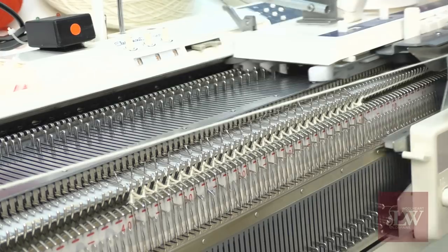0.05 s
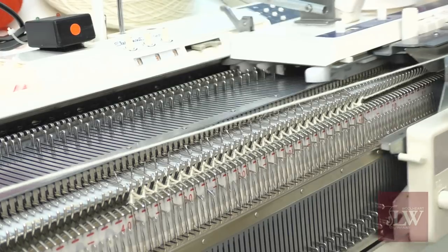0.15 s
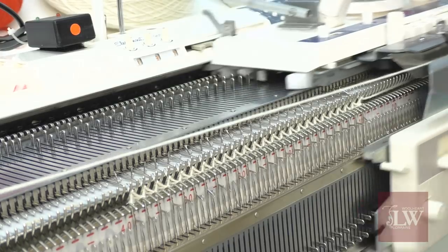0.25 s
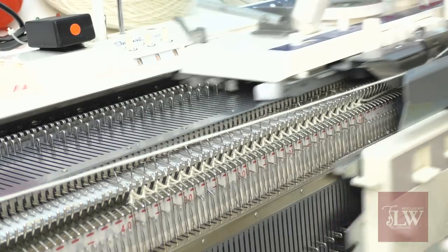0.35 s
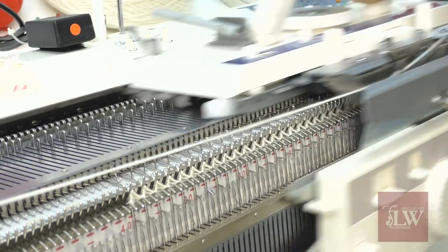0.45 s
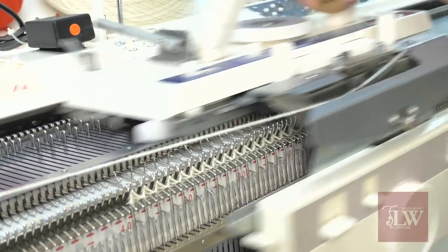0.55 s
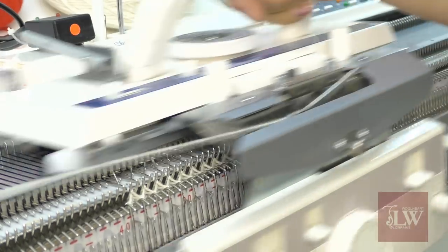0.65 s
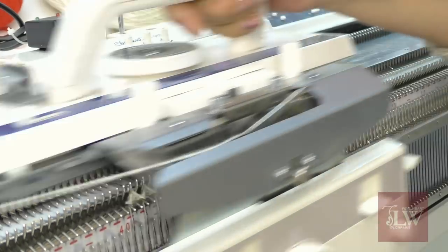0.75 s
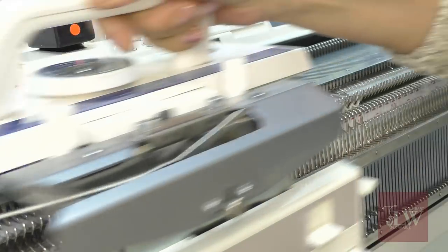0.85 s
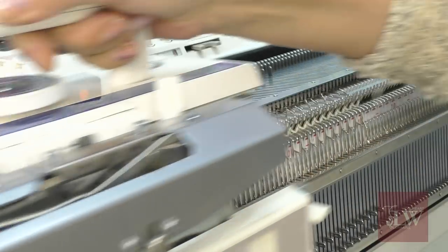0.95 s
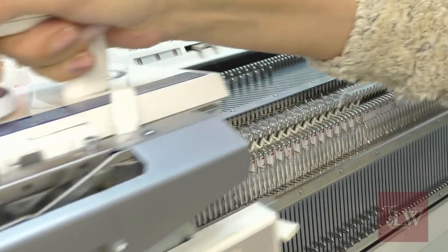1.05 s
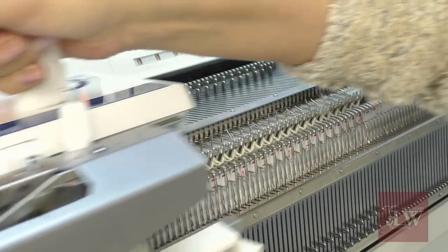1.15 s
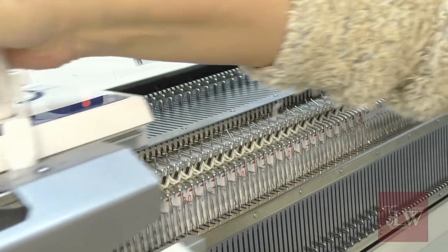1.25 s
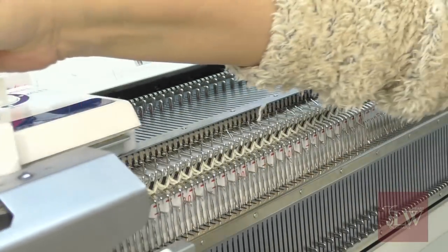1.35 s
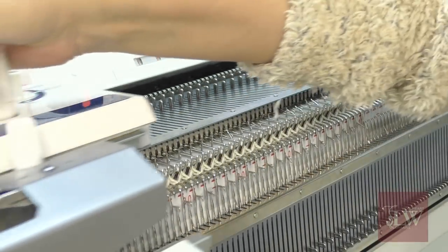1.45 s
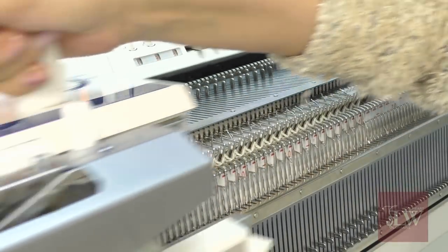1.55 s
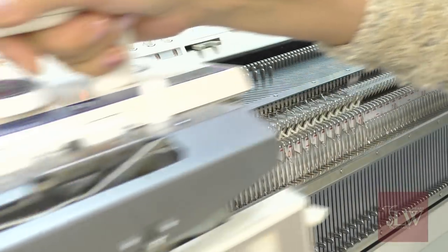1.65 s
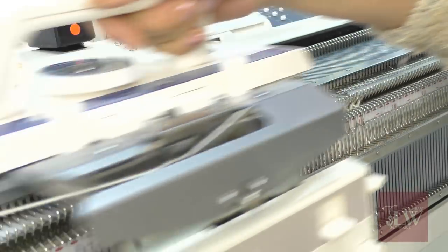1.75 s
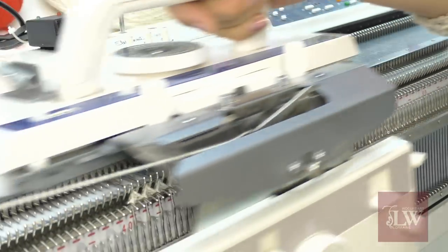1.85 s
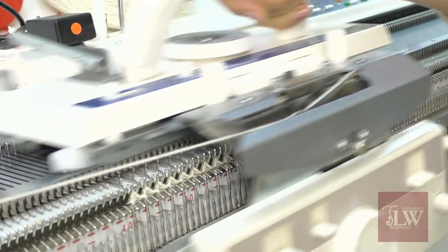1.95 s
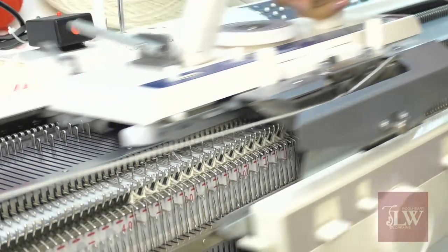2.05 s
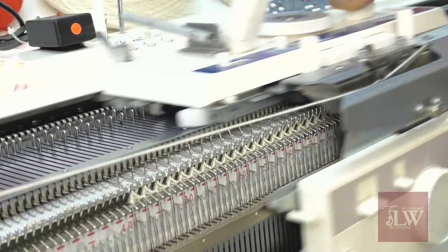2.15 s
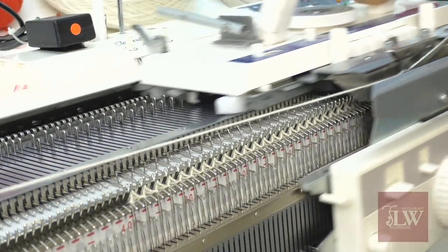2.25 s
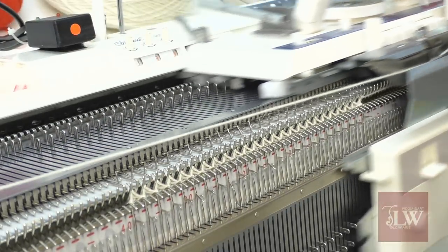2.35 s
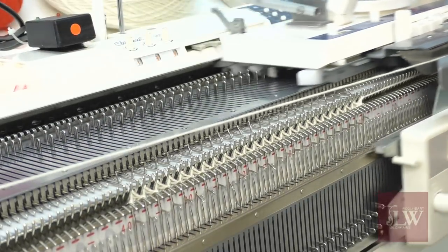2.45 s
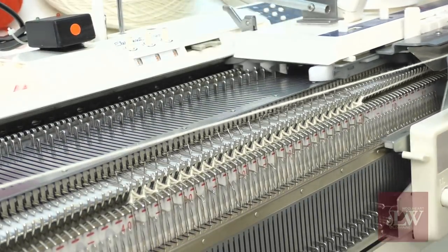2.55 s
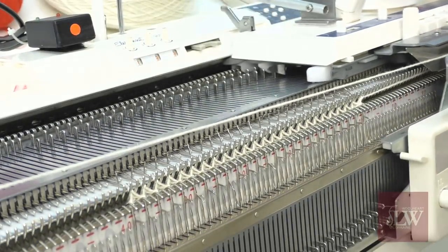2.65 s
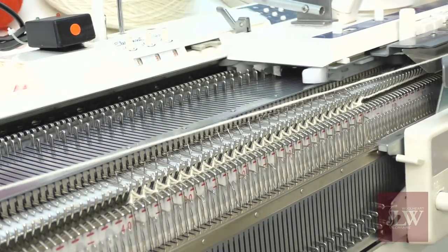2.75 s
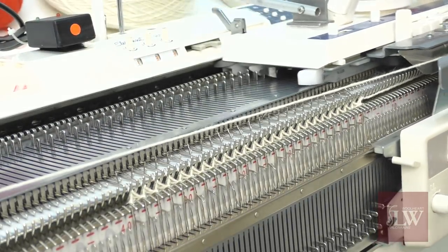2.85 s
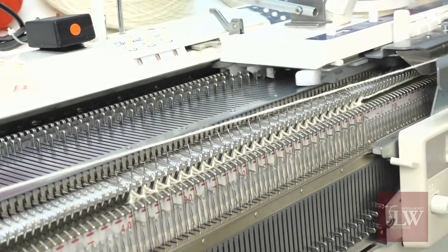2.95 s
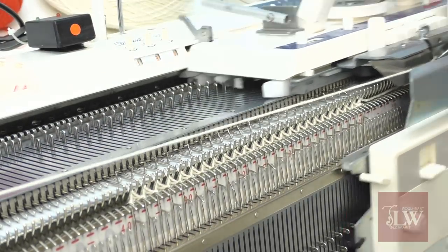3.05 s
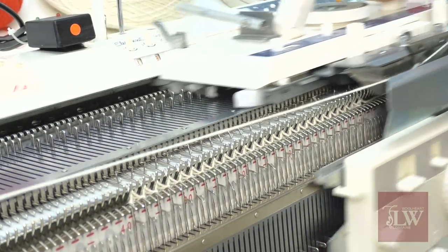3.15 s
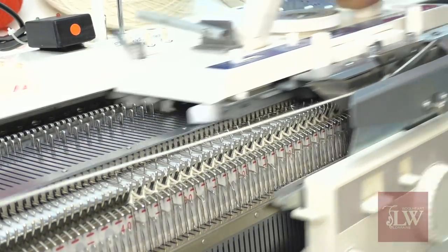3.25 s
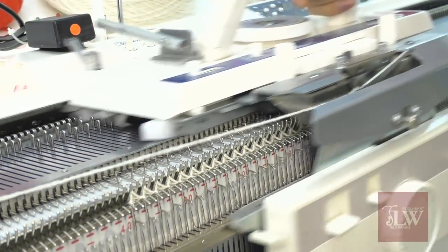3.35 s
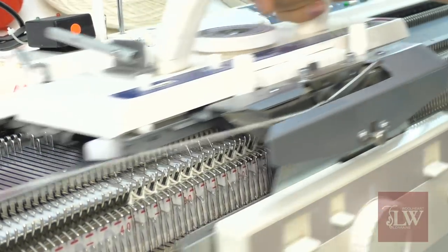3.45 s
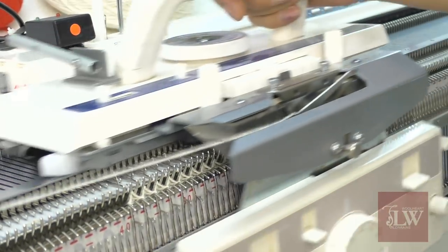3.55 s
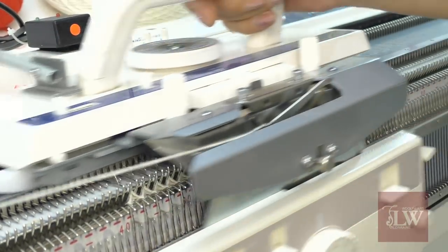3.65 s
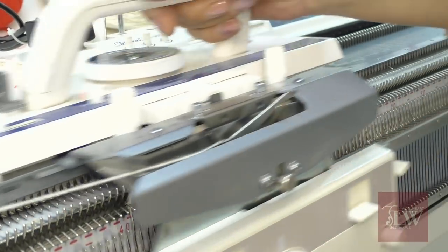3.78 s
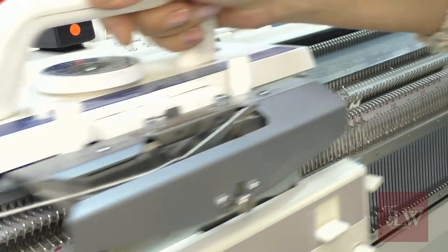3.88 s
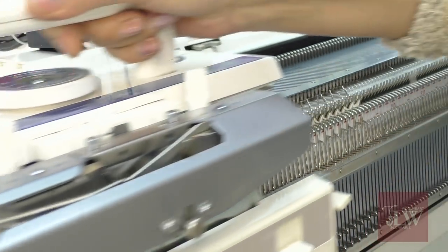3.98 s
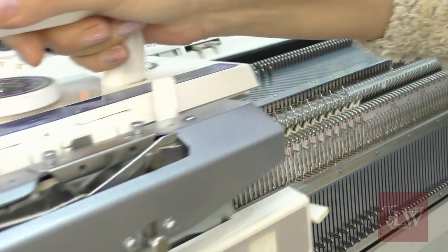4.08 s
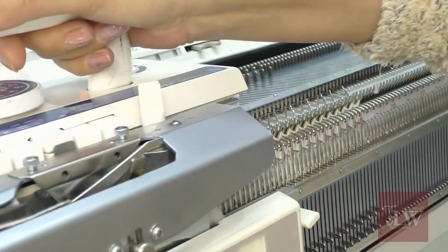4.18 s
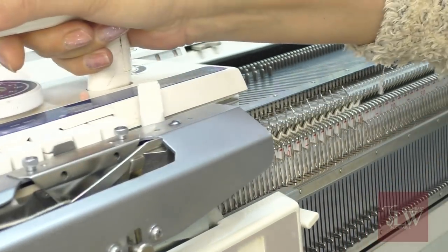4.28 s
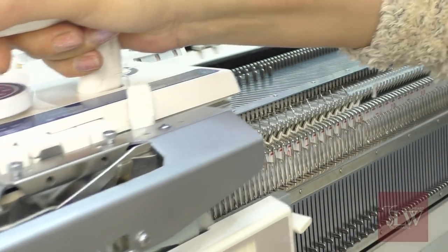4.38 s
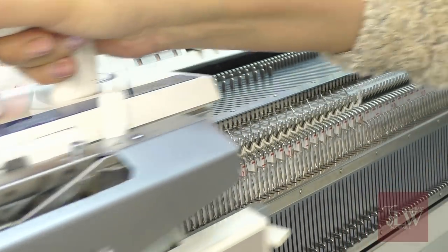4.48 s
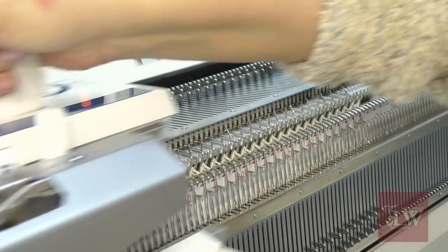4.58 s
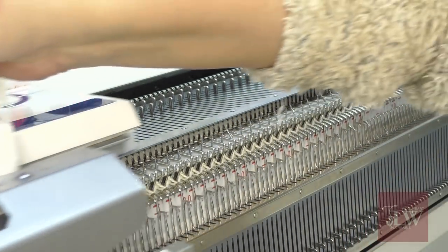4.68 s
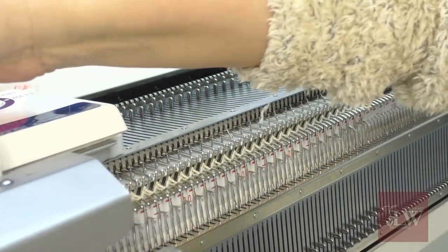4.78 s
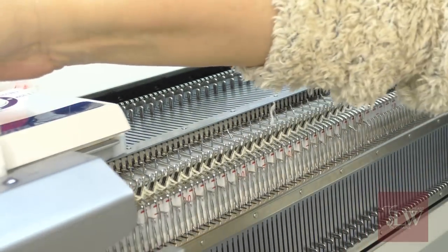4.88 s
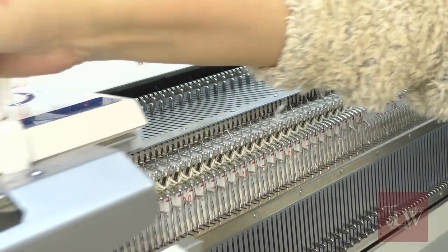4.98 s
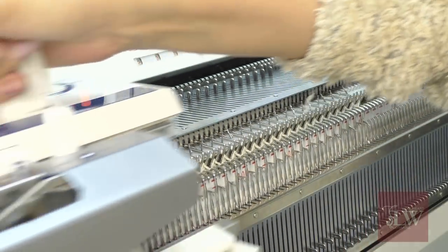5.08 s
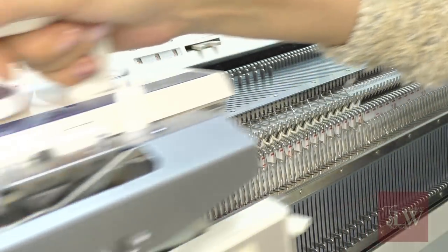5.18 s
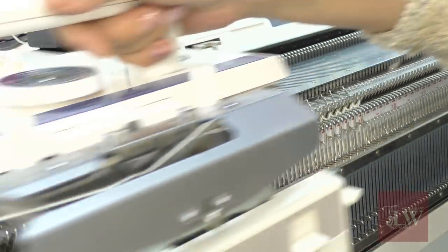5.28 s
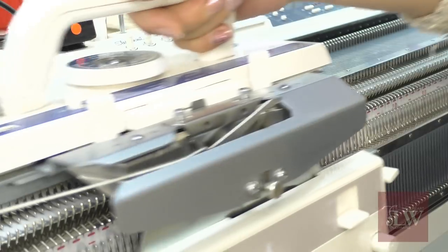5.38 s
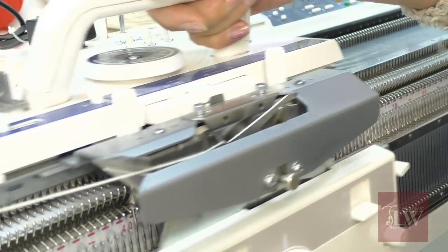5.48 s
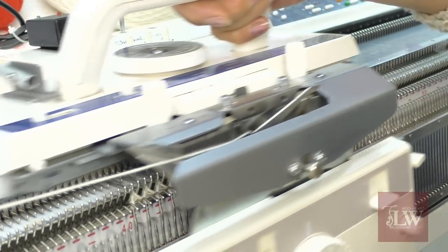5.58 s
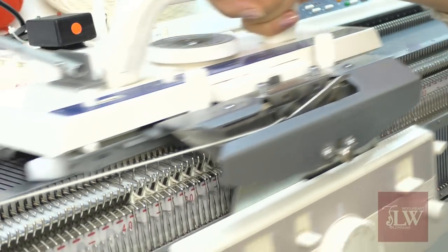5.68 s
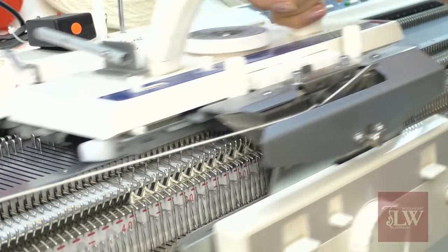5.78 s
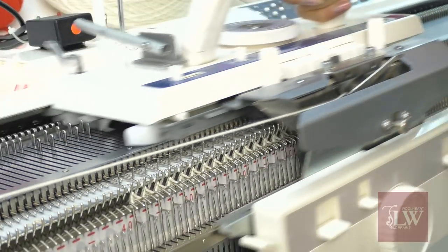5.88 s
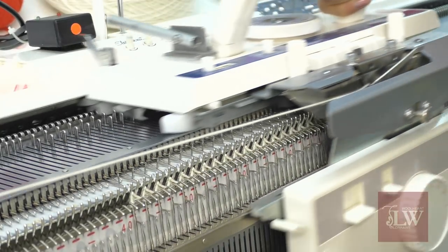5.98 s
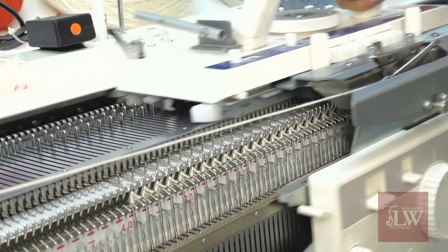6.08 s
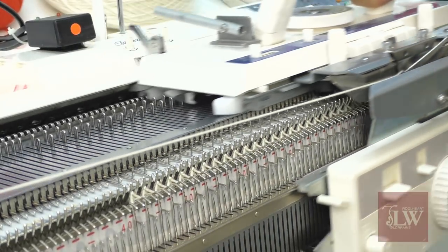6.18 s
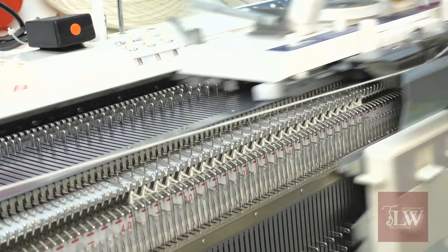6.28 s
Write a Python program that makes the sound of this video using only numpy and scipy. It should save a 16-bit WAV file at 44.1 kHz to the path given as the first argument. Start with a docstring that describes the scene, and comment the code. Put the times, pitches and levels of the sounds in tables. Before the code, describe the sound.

Very near the microphone, a carriage slides over a steel needle bed: dense zipping ticks and latch rattle over a low table rumble. Four strokes, out and back twice, are separated by quick lever clacks and short lulls. Steel squeals briefly, thin ringing lingers, and low gusty thumps jolt the microphone. The small room adds only a short tail.

```python
"""Knitting machine carriage, pushed by hand

A carriage is pushed to and fro along a steel needle bed, close by in a small room. Cams tick over the
needles and latches rattle: tiny random contacts and regular needle blows are coloured by the metal parts.
Levers clack at the turns, steel squeals briefly and the table knocks and groans: short bursts and resonances.
Low thuds and gusts, made of slow sine swings and deep noise, shake the microphone, and a limiter
ducks everything for a moment under the strongest of them."""
import sys
import numpy as np
from scipy import signal
from scipy.fft import rfft, irfft, next_fast_len
from scipy.io import wavfile
from scipy.ndimage import uniform_filter1d, minimum_filter1d

SR = 44100
rng = np.random.default_rng(int(sys.argv[2]) if len(sys.argv) > 2 else 0)


def store_pcm(level_fs):
    """Save levels as 16-bit WAV."""
    pcm = np.round(np.clip(level_fs, -1, 1) * 32767).astype(np.int16)
    wavfile.write(sys.argv[1], SR, np.atleast_2d(pcm).T)


N = 279133
TIME = np.arange(N) / SR  # seconds


def from_db(db):
    """Turn decibels into a gain."""
    return 10 ** (np.asarray(db) / 20)


def even(x, span_s):
    """Hold the running loudness (rms) near 1, leaving faster grain intact."""
    size = max(int(span_s * SR), 8)
    power = uniform_filter1d(uniform_filter1d(x * x, size), size)
    floor = 1e-4 * np.mean(x * x)
    return x / np.sqrt(np.maximum(power, 0) + floor)


def colour(x, spectrum):
    """Filter with the given spectrum, without sounding ahead of the input; unit power gain."""
    size = next_fast_len(len(x) + SR // 4)
    hz, db = np.transpose(spectrum)
    bins_hz = np.fft.rfftfreq(size, 1 / SR)
    gain = from_db(np.interp(np.log(bins_hz + 1), np.log(hz), db))
    gain = gain / np.sqrt(np.mean(gain ** 2))
    # folding the cepstrum gives the minimum-phase response
    cepstrum = irfft(np.log(gain), size)
    cepstrum[1:size // 2] *= 2
    cepstrum[size // 2 + 1:] = 0
    response = np.exp(rfft(cepstrum))
    return irfft(rfft(x, size) * response, size)[:len(x)]


def resonate(x, modes):
    """Let several resonances ring side by side, with unit power gain in all."""
    out, power = 0, 0
    for hz, width, db in modes:
        r = np.exp(-np.pi * width / SR)
        gain = from_db(db)
        top = gain * (1 - r * r) / 2
        poles = [1, -2 * r * np.cos(2 * np.pi * hz / SR), r * r]
        out = out + signal.lfilter([top, 0, -top], poles, x + 1e-18)
        power += gain ** 2 * np.pi * width / SR
    return out / np.sqrt(power)


def ring_on(x, t60, tail_db):
    """Add a diffuse tail: countless small reflections carry the energy on as dying noise."""
    r = from_db(-120 / (t60 * SR))
    energy = signal.lfilter([1 - r], [1, -r], x * x + 1e-18)
    return x + from_db(tail_db) * np.sqrt(energy) * rng.standard_normal(len(x))


def clicks(times, heights):
    """Place single impulses at the given times."""
    out = np.zeros(N)
    places = np.round(np.asarray(times) * SR).astype(int)
    out[np.clip(places, 0, N - 1)] = heights
    return out


def crack(hits, t60):
    """Make each contact chatter: a fast-dying burst of random sign."""
    r = from_db(-60 / (t60 * SR))
    return signal.lfilter([1], [1, -r], hits + 1e-18) * rng.choice([-1, 1], len(hits))


def held(s, rise_s, hold_s, fade_db_per_s):
    """Give an envelope that is fully up at s, holds, then dies away."""
    rise = np.clip(1 + (TIME - s) / rise_s, 0, 1) ** 2
    return rise * from_db(-fade_db_per_s * np.maximum(TIME - s - hold_s, 0))


def drift(span_s):
    """Wander slowly by chance, with spread 1."""
    size = int(span_s * SR)
    slow = uniform_filter1d(uniform_filter1d(rng.standard_normal(N), size), size)
    return slow / np.std(slow)


# Colour of the room's faint hush. Each row: frequency in Hz, relative level in dB.
HUSH_COLOUR = [(30, 3.5), (150, -3), (600, -5), (1500, -28), (5000, -34), (15000, -92.5)]


def room_hush(level_db=-59.5):
    """Steady noise, mostly low, stands for the quiet air of the room."""
    return from_db(level_db) * colour(rng.standard_normal(N), HUSH_COLOUR)


def room(x, t60=0.19, delay_s=0.0045):
    """A small furnished room returns dense reflections that die away evenly in dB."""
    t = TIME[:SR // 2]
    echoes = rng.standard_normal(len(t)) * from_db(-60 * t / t60) * (t > delay_s)
    return signal.fftconvolve(x, echoes / np.linalg.norm(echoes))[:N]


# The hand's pushes, in playing order, with straight lines between rows.
# Each row: time in seconds, speed in needles per second, needle rattle in dB, bed rumble in dB.
SETTLE = [(0, 33.5, -49, -46.5), (.07, 22.6, -54, -48.5), (.19, 11, -74, -63)]
FIRST_OUT = [(.3, 22, -60, -55), (0.499, 47, -38.5, -44), (.66, 74, -38.5, -45), (.84, 69, -47.5, -50),
             (1.0, 60, -36, -40), (1.131, 34.6, -51, -44.5), (1.181, 39, -53, -56.5),
             (1.281, 15, -57.5, -55.5), (1.459, 5.4, -80, -70.5)]
FIRST_BACK = [(1.63, 50, -59, -57.5), (1.691, 49, -38, -48), (1.849, 70, -26, -37), (1.881, 56, -34, -38),
              (1.981, 52, -42.5, -47.5), (2.1, 55.6, -37, -42), (2.26, 45.5, -37, -41),
              (2.361, 19.3, -47.5, -46.5), (2.51, 20.2, -55, -54.5), (2.701, 5.3, -85, -64.5)]
SECOND_OUT = [(3.071, 8.1, -81, -74), (3.091, 14.1, -65, -51), (3.179, 25.6, -44, -45),
              (3.33, 45, -35.5, -41.5), (3.56, 52, -35, -36.5), (3.649, 60, -38, -36.5),
              (4.02, 59, -34.5, -33.5), (4.22, 32, -47.5, -42), (4.32, 9.3, -87, -68)]
NUDGE = [(4.41, 14.8, -67, -52), (4.47, 40, -50, -45.5), (4.579, 30, -45, -46.5), (4.701, 14, -55.5, -53.5),
         (4.85, 9.1, -76.5, -61.5), (5.02, 8.5, -74.5, -61.5)]
SECOND_BACK = [(5.18, 40, -59, -57), (5.27, 57.5, -35.5, -46.5), (5.428, 57.7, -28.5, -35),
               (5.5, 49.6, -45, -40.5), (5.719, 41, -43.5, -45.5), (5.9, 36.4, -48, -52),
               (6.05, 30.5, -42.5, -44), (6.33, 13.8, -49, -51.5)]


def motion():
    """The hand's pushes set the carriage's speed, rattle and rumble at every sample."""
    pushes = [*SETTLE, *FIRST_OUT, *FIRST_BACK, *SECOND_OUT, *NUDGE, *SECOND_BACK]
    s, *columns = np.transpose(pushes)
    return [np.interp(TIME, s, column) for column in columns]


USUAL_RUMBLE_DB = -45.5  # trembling and table growl are set relative to this bed rumble

# The stand rocks when the hand starts or stops the carriage.
# Each row: time fully up in seconds, hold in seconds, level in dB.
ROCKINGS = [(0.046, 0.029, -32), (0.94, 0.039, -30), (1.26, 0.14, -27), (2.436, 0.35, -40.5),
            (3.2, 0.49, -23.5), (4.475, 0.042, -20.5), (5.926, 0.09, -22.5)]
# Colours of the sway and the trembling. Each row: frequency in Hz, relative level in dB.
SWAY_COLOUR = [(3, -17.5), (10, 4), (22, -3), (34, -18), (46, -15.5), (65, -30), (140, -53), (400, -90)]
TREMBLE_COLOUR = [(20, 5), (45, 1.5), (70, -4), (105, -2), (140, -12.5), (220, -24.5), (500, -65)]
# Draughts from the passing carriage hit the microphone.
# Each row: time fully up in seconds, hold in seconds, level in dB, fade in dB per second.
GUSTS = [(0.601, 0.11, -17.5, 73), (1.254, 0.017, -32.5, 150), (1.903, .04, -22.5, 151),
         (5.543, 0.0088, -8, 105), (5.757, 0.13, -31, 54)]
# Colour of the buffeting. Each row: frequency in Hz, relative level in dB.
BUFFET_COLOUR = [(20, -4), (42, 2), (65, -1.5), (85, -3.5), (120, -6.5), (170, -18.5), (260, -30),
                 (500, -54), (1500, -82)]


def swaying():
    """The microphone sways, trembles with the table and is buffeted by gusts, all as low noise."""
    _, _, rumble_db = motion()
    gust = np.max([from_db(db) * held(s, 0.06, hold, fade) for s, hold, db, fade in GUSTS], axis=0)
    rock = np.max([from_db(db) * held(s, 0.2, hold, 57.5) for s, hold, db in ROCKINGS], axis=0)
    still = from_db(-47)
    sway = np.hypot(np.hypot(rock, gust), still)
    # the trembling follows the bed rumble in part
    tremble = from_db(-47.5 + 0.63 * (rumble_db - USUAL_RUMBLE_DB))
    out = sway * even(colour(rng.standard_normal(N), SWAY_COLOUR), span_s=0.069)
    out += tremble * even(colour(rng.standard_normal(N), TREMBLE_COLOUR), span_s=0.088)
    out += gust * even(colour(rng.standard_normal(N), BUFFET_COLOUR), span_s=0.059)
    return out


# Low thuds. Each row: start in seconds, relative level in dB, pitch in Hz.
THUDS = [(0.539, -3, 34.4), (1.236, -11, 31), (1.286, -12.5, 39.2), (1.859, -3.5, 30.3),
         (3.528, -25, 27.94), (3.66, -20, 31), (3.85, -18, 22.13), (5.511, 11.5, 35.6),
         (5.815, -11.5, 35.4), (6.14, -18, 32)]


def thuds(t60=0.27, rise_s=0.0079):
    """Each thud sets off a heavily damped slow swing of the microphone."""
    out = np.zeros(N)
    for s, db, hz in THUDS:
        age = np.clip(TIME - s, 0, 1)
        envelope = from_db(db - 60 * age / t60) * (1 - np.exp(-age / rise_s))
        out += envelope * np.sin(2 * np.pi * hz * age)
    return out


# Soft knocks of the table as the hand changes its push. Each row: start in seconds, relative level in dB.
KNOCKS = [(.219, -44), (1.12, -34.5), (2.664, -60), (2.797, -49), (2.883, -49), (4.062, -28), (4.385, -52),
          (4.485, -30.5), (4.549, -36)]
# Colour of the needle bed. Each row: frequency in Hz, relative level in dB.
BED_COLOUR = [(300, -15), (440, -16.5), (540, 2), (700, 5.5), (900, -2.5), (1100, 1), (1400, -16.5),
              (2600, -27.5)]
# Resonances of the needle bed and of the table under it. Each row: pitch in Hz, width in Hz, relative level in dB.
BED_MODES = [(547.7, 5.7, 9.5), (588, 64, 7.5), (720, 41, 4), (771.6, 10, 12), (861, 88, 2.5),
             (1043, 140, -1.5)]
TABLE_MODES = [(113.7, 14, 10), (179.6, 39, 7.5), (275, 57, 1.5), (365, 34, -0.5), (400, 40, 2),
               (418, 54, -13), (463, 14, -12)]


def table_knocks():
    """Dull bumps chatter and die away in the bed and the table only."""
    s, db = np.transpose(KNOCKS)
    bumps = ring_on(crack(clicks(s, from_db(db)), t60=0.031), t60=0.27, tail_db=-2)
    out = colour(bumps, BED_COLOUR)
    out += from_db(-7.5) * resonate(bumps, TABLE_MODES)
    return out + from_db(-26.0) * resonate(bumps, BED_MODES)


# Thin steel springs set singing. Each row: start in seconds, starting level in dB, pitch in Hz.
SPRING_HITS = [(.055, -60, 4350), (1.23, -73, 5745), (2.391, -70, 4350), (2.502, -77, 5745),
               (2.605, -73.5, 4350), (4.247, -64, 5745)]


def springs(t60=0.98):
    """Thin steel tones linger after some blows, as slowly fading sines."""
    out = np.zeros(N)
    for s, db, hz in SPRING_HITS:
        age = np.maximum(TIME - s, 0)
        out += from_db(db - 60 * age / t60) * np.sin(2 * np.pi * hz * age)
    return out


# Long-ringing tones of the steel rails and needles. Each row: pitch in Hz, width in Hz, relative level in dB.
STEEL_MODES = [(1574, 22, 2), (2266, 15, -13), (3200, 16, 1), (3545, 12, 8), (4000, 14, -0.5),
               (4370, 10, -16), (4300, 5.1, 1.5), (5744, 6.7, 4.5), (6000, 15, 6), (6680, 16, 3.5),
               (7720, 16, -16), (8200, 19, -2), (8400, 38, -2.5), (8700, 35, -22), (11700, 4.2, -12)]


def steel_ringing(machine):
    """The machine's own noise excites narrow resonances of its steel."""
    spread = ring_on(machine, t60=0.0035, tail_db=5.0)
    return from_db(-28.0) * resonate(spread, STEEL_MODES)


# Squeals and scrapes of steel sliding on steel.
# Each row: middle in seconds, length in seconds, level in dB, pitch in Hz, width in Hz.
SQUEALS = [(1.824, 0.088, -38, 1846, 600), (3.296, 0.038, -35.5, 1550, 400),
           (3.342, 0.046, -36.5, 1420, 300), (3.342, 0.05, -39.5, 2280, 300), (3.448, .05, -44, 4200, 130),
           (5.238, 0.056, -44.5, 1850, 300), (5.356, .14, -38, 1635, 597.5)]


def squeals():
    """Sticking steel sings briefly in one resonance."""
    out = np.zeros(N)
    for s, length, db, hz, width in SQUEALS:
        swell = np.exp(-(2 * (TIME - s) / length) ** 2)
        tone = resonate(rng.standard_normal(N), [(hz, width, 0)])
        out += from_db(db) * swell * even(tone, span_s=0.061)
    return out


# Lever and cam clacks. Each row: start in seconds, relative level in dB,
# bright ring and bed knock, both in dB on top of that level.
CLACKS = [(0.056, -28.5, 0, -22), (0.309, -30.5, -3, -7), (1.1044, -25.5, -2, -11),
          (1.1954, -28.5, 4.5, -22.5), (1.2311, -24, -3, -29), (2.391, -21, 0, -28),
          (2.5018, -30.5, 0.5, -4), (2.603, -41, -1, -24), (2.7821, -50, -2, -21), (3.0856, -35, -13, 2),
          (3.1219, -27.5, -14, -11), (3.164, -24.5, -5, -11), (3.9494, -13.5, -17, -18),
          (4.2466, -25, -3, -23), (4.3707, -41, -8, -13), (4.4287, -28, -13, -18), (4.4819, -23, -7, -16),
          (4.547, -32, -6, -15), (4.5902, -24, 2, -12), (4.6211, -23, -4, -15), (4.9041, -45, -9, -20),
          (5.4206, -10, -2.5, -7), (6.1684, -36, -4, -14)]
# Colour of the snap. Each row: frequency in Hz, relative level in dB.
CLACK_COLOUR = [(200, 17.5), (800, 9), (2000, 15.5), (4000, 14.5), (6000, 7), (10500, 14), (13000, 3),
                (16000, -16)]
# Resonances of the levers. Each row: pitch in Hz, width in Hz, relative level in dB.
LEVER_MODES = [(2000, 190, -9), (4100, 110, -13), (5700, 180, 1.5), (6300, 1200, 2.5), (7400, 540, -2)]


def levers():
    """Levers and cams snap over: a crack, their own ring and a knock in the bed, each with a short tail."""
    s, db, ring_db, knock_db = np.transpose(CLACKS)
    snap = crack(clicks(s, from_db(db - 10.5)), t60=0.02)
    snap = ring_on(snap, t60=0.069, tail_db=1.0)
    ring = crack(clicks(s, from_db(db + ring_db - 9.5)), t60=0.018)
    ring = ring_on(ring, t60=0.085, tail_db=-2)
    knock = crack(clicks(s, from_db(db + knock_db - 1)), t60=0.0044)
    knock = ring_on(knock, t60=0.077, tail_db=2.0)
    out = colour(snap, CLACK_COLOUR) + resonate(ring, LEVER_MODES)
    return out + colour(knock, BED_COLOUR) + from_db(-4.5) * resonate(knock, TABLE_MODES)


# On the way back the cams tick more clearly and the shell is quieter.
# Each row: first tick in seconds, end in seconds.
RETURNS = [(1.8703, 2.7), (5.6722, 6.33)]


def needles_passed(speed):
    """Add up the speed into needles passed, counted afresh from the first tick of each return."""
    travel = np.cumsum(speed) / SR
    for start, _ in RETURNS:
        travel = travel - np.interp(start, TIME, travel) * (TIME > start)
    return travel


def needle_hits(travel, jitter_s=0.0002, uneven_db=1.3):
    """One blow falls each time a needle butt meets the cam, a little uneven in time and force."""
    times = TIME[1:][np.diff(np.floor(travel)) > 0]
    chance = rng.standard_normal((len(times), 2))
    return clicks(times + jitter_s * chance[:, 0], from_db(uneven_db * chance[:, 1]))


def cam_ticks(hits, length_s=0.0032):
    """Each needle butt grazes the cam for an instant: a short burst of random sign."""
    graze = np.hanning(int(length_s * SR)) ** 2
    return np.convolve(hits, graze, "same") * rng.choice([-1, 1], N)


def rubbing(density, surge, spread_db):
    """A fresh swarm of tiny contacts of uneven size, at random moments, surges with the drag."""
    born = rng.random(N) < density / SR
    size = from_db(spread_db * np.clip(rng.standard_normal(N), -2, 2))
    grains = born * rng.choice([-1, 1], N) * size
    return surge * even(ring_on(grains, t60=0.01, tail_db=2), span_s=0.12)


# The table groans when the hand starts or brakes the carriage hard.
# Each row: time fully up in seconds, hold in seconds, level in dB.
GROANS = [(1.005, 0.13, -49.5), (3.096, 0.068, -58), (3.847, .38, -41), (4.486, 0.055, -38.5),
          (5.43, 0.074, -39)]


def table_growl(bed_db):
    """The table's loudness follows the bed rumble and swells at each groan."""
    groan = np.max([from_db(db) * held(s, 0.031, hold, 180) for s, hold, db in GROANS], axis=0)
    steady = from_db(-51 + 0.97 * (bed_db - USUAL_RUMBLE_DB))
    return np.hypot(groan, steady)


# How clear the ticks are: clearest at a brisk pace, weakest at a rush.
# Each row: speed in needles per second, tick level before the extra on returns, in dB.
TICKS_BY_SPEED = [(8, -7), (24, -11.5), (53, -5), (62, -16)]
# Colours of latches, cam ticks, carriage shell and table. Each row: frequency in Hz, relative level in dB.
LATCH_COLOUR = [(1500, -45), (3000, -3.5), (4200, -8.5), (5000, -6.5), (5750, 0.5), (6700, -2), (8200, 0.5),
                (9500, 1), (11000, -1.5), (12500, -7.5), (15500, -15.5)]
TICK_COLOUR = [(300, -18), (1500, -43), (3200, -0.5), (4200, 9), (5100, 2.5), (5800, 0), (7000, 4.5),
               (9000, 8), (11000, 3), (13000, -3), (16000, -13.5)]
SHELL_COLOUR = [(600, -18.5), (1200, 0.5), (1700, 3), (2400, 6.5), (3300, -1.5), (4300, 1.5), (7000, -20)]
TABLE_COLOUR = [(70, -17), (150, 2.5), (240, -3), (340, 4), (470, 6.5), (600, -8), (1000, -38)]
# Resonances of the carriage shell. Each row: pitch in Hz, width in Hz, relative level in dB.
SHELL_MODES = [(1510, 120, 3), (1770, 660, 5), (2367, 31, 8.5), (3065, 40, -2)]


def carriage(surge_db=1.3, contacts_per_needle=70, idle_contacts_per_s=2000):
    """Regular cam ticks and a swarm of latch clicks sound in the needles, the shell, the bed and the table."""
    speed, rattle_db, bed_db = motion()
    returning = sum((TIME > start) & (TIME < end) for start, end in RETURNS)
    tick_db = np.interp(speed, *np.transpose(TICKS_BY_SPEED)) + 5 * returning
    # the shell follows partly the rattle, partly the rumble
    shell_db = bed_db + 0.46 * (rattle_db - bed_db) - 2.5 - 1.5 * returning
    # the drag is uneven from stitch to stitch
    bed_db = bed_db + 1.3 * drift(span_s=0.035)
    growl = table_growl(bed_db)

    travel = needles_passed(speed)
    hits = needle_hits(travel)
    ticks = from_db(tick_db) * even(cam_ticks(hits), span_s=0.13)
    # the drag rises and falls once per needle
    surge = from_db(surge_db * np.cos(2 * np.pi * (travel - 0.1)))
    density = idle_contacts_per_s + contacts_per_needle * speed

    latches = ring_on(rubbing(density, surge, spread_db=9.5), t60=0.023, tail_db=-3)
    cams = ring_on(ticks, t60=0.051, tail_db=-11)
    needles = colour(latches, LATCH_COLOUR) + colour(cams, TICK_COLOUR)

    shell = colour(rubbing(density, surge, spread_db=6.0) + from_db(-16) * ticks, SHELL_COLOUR)
    shell += from_db(-8) * resonate(rubbing(density, surge, spread_db=-1.5), SHELL_MODES)

    # the heavy parts take each needle as one push, so they growl at multiples of the needle rate
    push = even(hits, span_s=0.099)
    bed = colour(rubbing(density, surge, spread_db=1.0) + from_db(-12.5) * push, BED_COLOUR)
    bed += from_db(-2.5) * resonate(rubbing(density, surge, spread_db=3.0), BED_MODES)

    table = from_db(-4.5) * colour(rubbing(density, surge, spread_db=3.0), TABLE_COLOUR)
    shove = from_db(-6) * rubbing(density, surge, spread_db=4.5) + from_db(-4.5) * push
    table += resonate(shove, TABLE_MODES)

    out = from_db(rattle_db) * even(needles, span_s=0.081)
    out += from_db(shell_db) * even(shell, span_s=0.12)
    out += from_db(bed_db) * even(bed, span_s=0.03)
    return out + growl * even(table, span_s=0.082)


def scene():
    """The machine sounds close by, its steel ringing along, over the shaking and the faint hush of the room."""
    machine = carriage() + levers() + squeals() + table_knocks()
    machine = machine + steel_ringing(machine) + springs()
    shaking = swaying() + thuds()
    return (machine + from_db(-14.5) * room(machine) + shaking + room_hush())[None]


def record(dry, ceiling=0.205, release_db_per_s=110, cutoff_hz=15900):
    """A limiter ducks everything under strong peaks and recovers steadily; the top is cut steeply."""
    over_db = 20 * np.log10(np.maximum(np.abs(dry) / ceiling, 1))
    release_db = release_db_per_s * TIME
    duck_db = np.maximum.accumulate(over_db + release_db, axis=-1) - release_db
    # the gain drops just ahead of a peak, and smoothly
    gain = uniform_filter1d(minimum_filter1d(from_db(-duck_db), size=257), size=257)
    low_pass = signal.ellip(12, 0.1, 90, cutoff_hz, fs=SR, output="sos")
    return signal.sosfilt(low_pass, dry * gain)


dry = scene()
out = record(dry)
store_pcm(out)
```